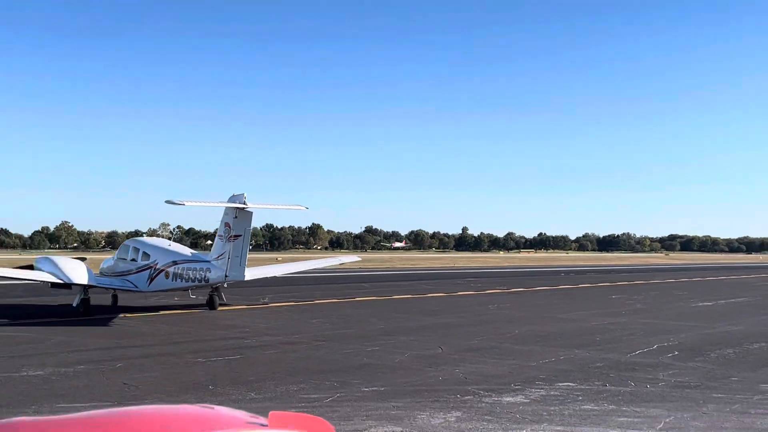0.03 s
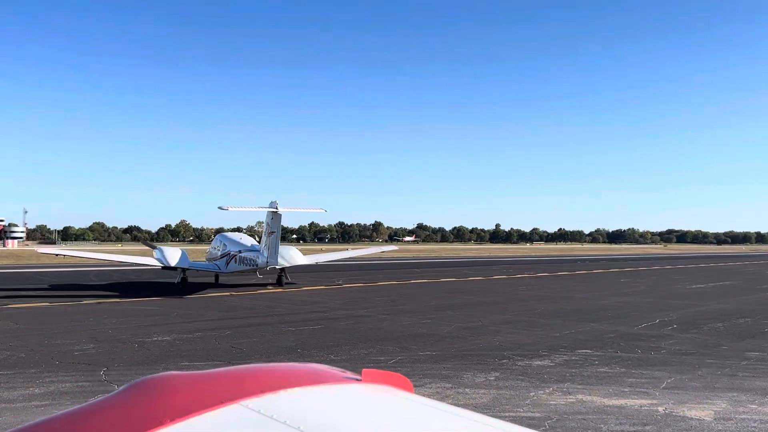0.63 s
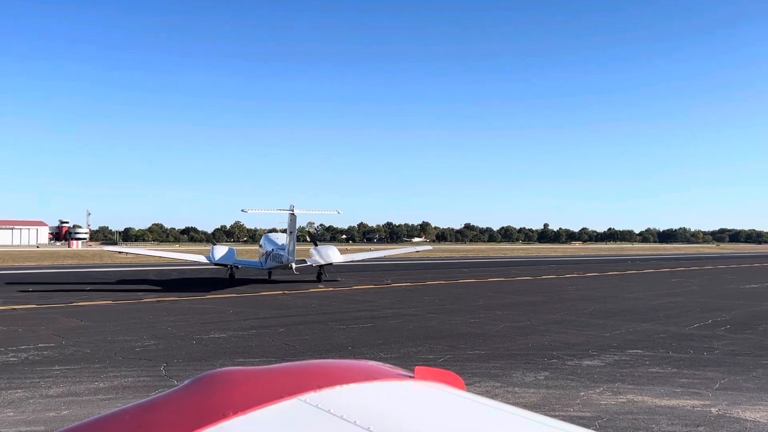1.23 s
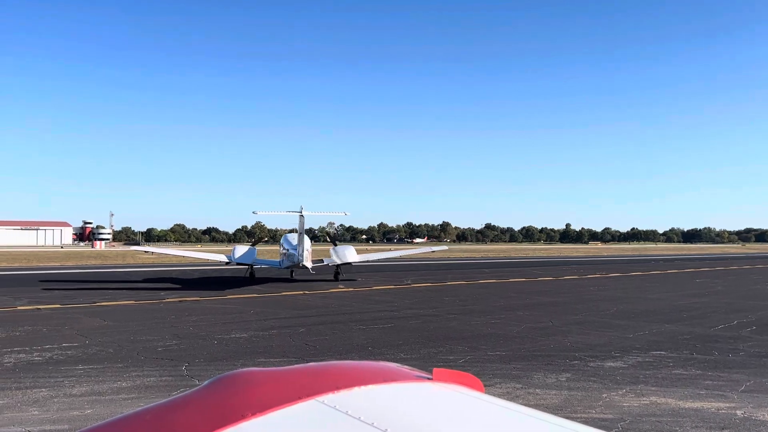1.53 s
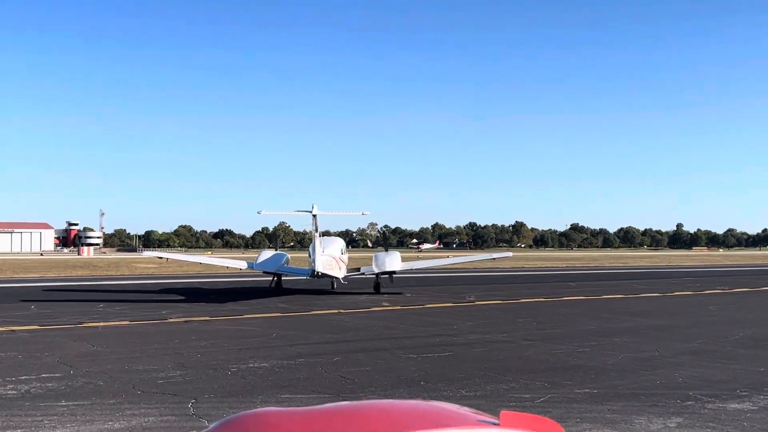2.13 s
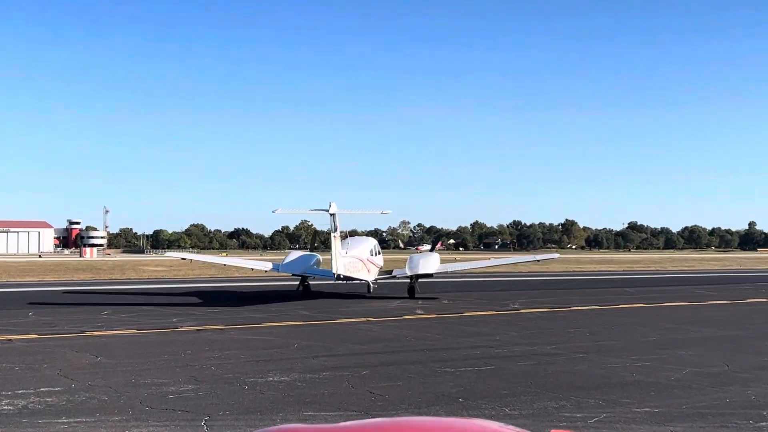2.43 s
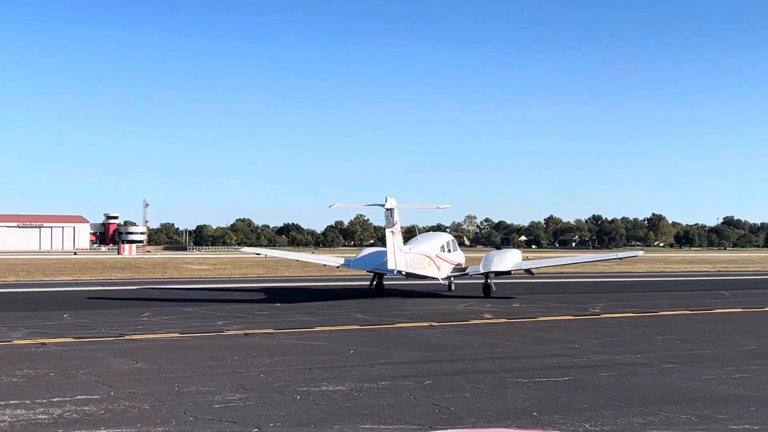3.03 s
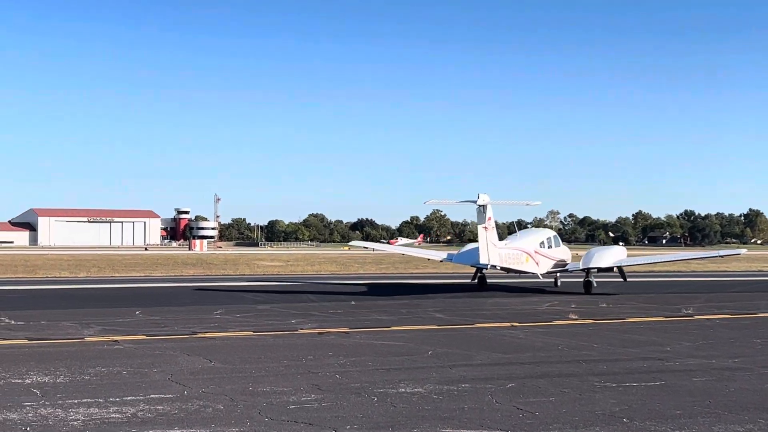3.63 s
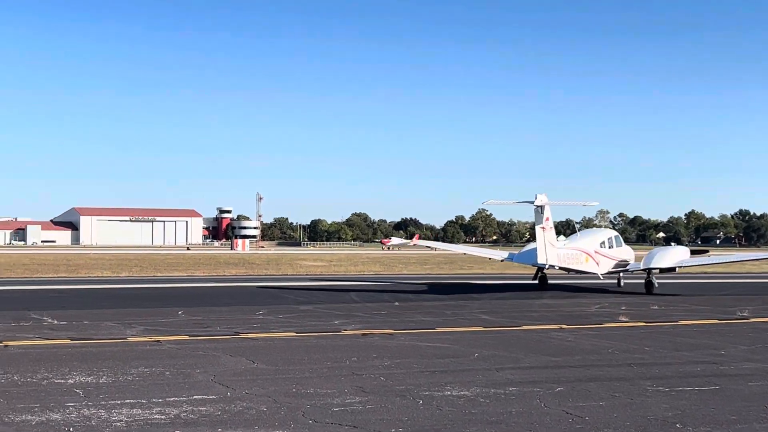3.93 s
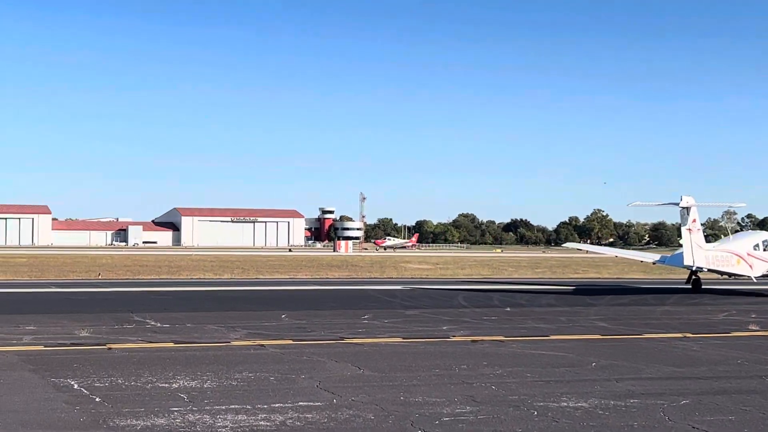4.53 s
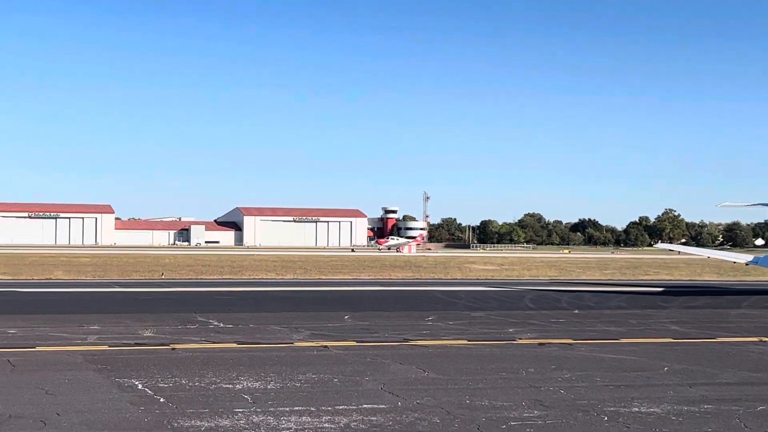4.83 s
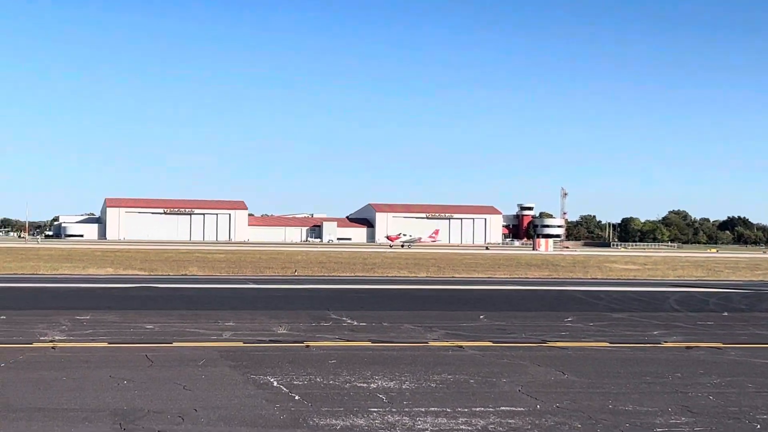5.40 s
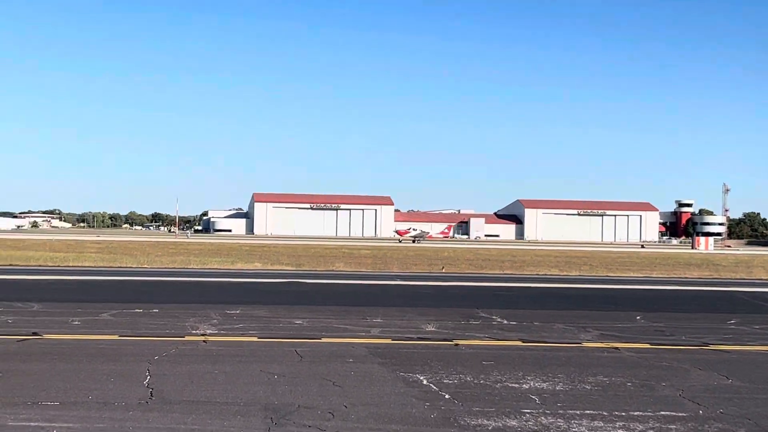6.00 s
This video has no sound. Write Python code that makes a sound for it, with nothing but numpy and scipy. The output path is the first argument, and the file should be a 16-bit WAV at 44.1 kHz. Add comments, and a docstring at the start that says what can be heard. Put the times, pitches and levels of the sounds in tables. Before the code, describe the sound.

A small twin-engine propeller plane taxis close by on open tarmac, its piston engines droning throughout. It starts with raspy exhaust barks, metallic clatter and hissing propeller wash that rumbles on the microphone. One engine rises slightly in pitch over the first two seconds. Around 1 to 1.3 seconds there is a brief blade slap and a gust thump, and the bright sizzle fades by 2 seconds. Short barks and rattles keep breaking through the drone. From 3 seconds one engine is throttled back, its pitch sinking, and the fast flutter between the engines slows into a throb; the wind buffeting drops near 3.6 seconds. A propeller slaps in rapid, choppy bursts from about 4.1 to 4.6 seconds and again from 5.3 to 6, while an airy whir grows. A few faint dry ticks occur, and the engines are still running at the end, just past 6 seconds.

```python
"""A light twin-engine piston plane taxis past and turns right on an airfield apron.
At first both exhausts drone and bark, and the propeller wash rumbles and hisses while the tail points
this way. The left engine is opened up for the turn; after three seconds it is throttled back, so the
beat between the two firing rates slows. From four seconds on the right propeller slaps as its disc
swings edge-on, and its whir comes forward."""
import sys
import numpy as np
from scipy import signal
from scipy.fft import rfft, irfft, next_fast_len
from scipy.io import wavfile
from scipy.ndimage import map_coordinates

SR = 44100
rng = np.random.default_rng(int(sys.argv[2]) if len(sys.argv) > 2 else 0)


def wrap_up_sound(samples):
    """Save the sound to the file named by the first command line argument, as 16-bit audio."""
    columns = np.atleast_2d(samples).T
    # keep every value between -1 and 1, then stretch to whole-number steps
    tamed = np.clip(columns, -1, 1)
    steps = np.round(tamed * 32767).astype(np.int16)
    wavfile.write(sys.argv[1], SR, steps)


N = 276066
TIME = np.arange(N) / SR
SIDES = np.array([[.5], [-.5]])  # shares a level or phase difference between left and right

# Engine speeds. Each row: time in seconds, firing rate in Hz.
LEFT_SPEED = [(0.0, 45.98), (0.34, 48.0), (1.06, 49.76), (2.1, 50.75), (3.0, 50.84), (3.47, 48.79),
              (4.29, 43.47), (4.75, 41.84), (5.2, 41.03), (5.68, 40.99), (6.0, 40.22), (6.26, 38.84)]
RIGHT_SPEED = [(0.0, 41.05), (2.04, 41.06), (4.85, 40.86), (5.74, 41.77), (6.26, 40.49)]
# Exhaust strength through the turn. Each row: time in seconds, boom in dB, drone in relative dB.
LEFT_EXHAUST = [(0.2, -17.5, -20.5), (1.3, -17.5, -23), (2.4, -28, -24), (3.3, -25.5, -27.5),
                (4.6, -26.5, -29.5), (5.35, -24.5, -28.5), (6.26, -27, -28)]
RIGHT_EXHAUST = [(0, -22.5, -20.5), (1.1, -24, -36.5), (3.5, -25.5, -30), (4.7, -26, -30.5),
                 (5.6, -28, -37)]
# Spectra of the pipe, its gas puffs and its pulse fronts. Each row: frequency in Hz, gain in dB.
PIPE_SPECTRUM = [(38, -7), (43, -7.5), (50, 3), (122, 0.5), (150, -1), (170, -8.5), (210, -11),
                 (250, -11.5), (290, -16), (340, -15), (450, -22), (700, -25.5), (1000, -32.5), (1500, -24)]
PUFF_SPECTRUM = [(120, -10), (300, -0.5), (500, 8), (750, -1), (1050, -1.5), (1330, 7), (1550, -1.5),
                 (1750, 1.5), (2050, -4), (2500, -9.5), (3500, -22.5), (6000, -30), (12000, -76)]
PUNCH_SPECTRUM = [(150, -34), (400, -2.5), (600, -1.5), (800, 1.5), (1050, -7), (1330, -2), (1570, -5.5),
                  (1720, -3), (2000, -11), (2600, -15.5), (5000, -32.5)]
# Surges in which an exhaust barks and rattles its cowling. Each row: centre in seconds, engine,
# half length in seconds, bark pitch in Hz, then bark, punch, rasp and rattle levels in dB.
SURGES = [(0.147, "left", 0.15, 623, -44, -42.5, -49, -40), (0.206, "right", 0.12, 690, -56, -64, -52, -53),
          (0.495, "left", 0.089, 310, -31.5, -50, -64, -54),
          (0.805, "left", 0.12, 635, -50, -44.5, -58, -67),
          (1.233, "left", 0.068, 520, -54, -48.5, -58, -54),
          (1.99, "right", 0.17, 860, -46.5, -46, -45.5, -54),
          (2.443, "left", 0.091, 436, -49, -63, -67, -48), (2.59, "left", 0.048, 537, -46, -64, -58, -53),
          (2.67, "left", 0.045, 420, -37, -37.5, -49, -45),
          (2.755, "left", 0.04, 560, -42, -37.5, -50, -52),
          (2.99, "left", 0.051, 490, -38.5, -49.5, -56, -47),
          (3.02, "left", 0.12, 199, -33.5, -64, -57, -53), (3.1, "left", 0.026, 595, -46, -50, -44, -44),
          (3.333, "left", 0.045, 385, -35.5, -54, -51, -54),
          (3.474, "left", 0.073, 550, -39, -62.5, -57, -50),
          (3.722, "left", 0.063, 590, -46, -44.5, -47, -47),
          (3.893, "left", 0.088, 545, -37, -53, -54, -53), (4.102, "right", 0.096, 296, -52, -44, -44, -44),
          (4.286, "right", 0.15, 280, -36.5, -52, -39.5, -47),
          (4.9, "right", 0.18, 314, -36, -58, -55, -52.5), (5.758, "left", 0.1, 287, -38.5, -65, -58, -45)]
# Ringing bands of the left exhaust.
# Each row: centre and half length in seconds, band centre and half width in Hz, level in dB.
GROWLS = [(0.15, 0.16, 620, 115, -32), (0.2, 0.33, 1800, 150, -39), (0.33, 0.07, 810, 80, -36),
          (1.28, 0.15, 1180, 150, -44), (1.7, 0.3, 800, 120, -43)]

# Spectra of the blade pulses. Each row: frequency in Hz, gain in dB.
LEFT_BLADE = [(200, -43), (600, 3), (1200, 22), (2000, 12.5), (3300, 1), (5000, -9), (14000, -25)]
RIGHT_BLADE = [(150, -25.5), (380, 17), (850, 12.5), (1400, 6.5), (1700, -2), (2150, -8.5), (2650, -6),
               (3300, -11), (4500, -13), (14000, -17.5)]
# Spells of slap as a propeller disc swings edge-on. Each row: centre in seconds, engine,
# half length in seconds, ring pitch in Hz, ring level in dB, crack level in dB.
SLAPS = [(1.048, "left", 0.025, 2050, -38, -30), (1.085, "left", 0.013, 1650, -35, -38),
         (1.327, "left", 0.16, 1410, -66, -41), (4.108, "right", 0.064, 1410, -40, -44),
         (4.177, "right", 0.015, 1400, -37, -35.5), (4.244, "right", 0.03, 1450, -37, -36.5),
         (4.323, "right", 0.07, 1500, -40.5, -39.5), (4.458, "right", 0.065, 1670, -40, -41.5),
         (4.58, "right", 0.036, 1750, -39, -36.5), (5.314, "right", 0.067, 1400, -39, -35.5),
         (5.418, "right", 0.063, 890, -42, -36), (5.517, "right", 0.049, 1100, -44, -32),
         (5.585, "right", 0.011, 1450, -39, -34.5), (5.677, "right", 0.071, 1100, -39, -29),
         (5.777, "right", 0.038, 1390, -30, -29.5), (5.819, "right", 0.032, 2800, -40, -34.5),
         (5.864, "right", 0.041, 810, -40, -33), (5.944, "right", 0.03, 515, -32.5, -41.5),
         (6, "right", 0.043, 880, -39.5, -38)]
# Modes rung by slaps, surges and valves, in that order. Each row: frequency in Hz, Q, gain in dB.
AIRFRAME_MODES = [(910, 5, -8), (1420, 12, -11.5), (1680, 22, -11), (2650, 7, -17)]
PANEL_MODES = [(1340, 9, -2), (1700, 12, 0)]
COWLING_MODES = [(1739, 11.5, 1.5), (1964, 11, -2), (4960, 14, -14)]

# Spectra of the five wash noises and the engine's sizzle. Each row: frequency in Hz, gain in dB.
RUMBLE_SPECTRUM = [(15, -36), (28, -16), (42, -14), (58, 0.5), (75, -7), (110, -8), (180, -18.5),
                   (300, -44), (800, -57)]
RUSH_SPECTRUM = [(60, -0.5), (130, 10.5), (240, 5), (350, 3), (500, -7), (800, -3.5), (1050, -9),
                 (1400, -6), (1780, -12), (2200, -16), (3500, -34), (6000, -34), (15000, -69)]
WHIR_SPECTRUM = [(1500, -38), (2200, -8), (2550, -2), (2850, 4), (3300, 2), (3900, -5), (4500, -7),
                 (7000, -34)]
HISS_SPECTRUM = [(1500, -24), (2400, 8.5), (3700, 8), (4400, 6.5), (4950, 4.5), (5500, 3.5), (6500, 2.5),
                 (9000, 1), (15500, -5.5)]
SLIPSTREAM_SPECTRUM = [(400, -10), (720, 20.5), (1100, 5), (1550, -5), (1780, 11.5), (2050, 3.5),
                       (2450, 3.5), (3600, 6.5), (4400, -11), (6000, -3.5), (7300, -0.5), (9000, 3),
                       (12500, -4), (15500, 0)]
SIZZLE_SPECTRUM = [(2200, -23), (3500, 2), (4400, -13), (6000, -12), (7300, 4), (9000, -2.5), (12500, 1.5),
                   (15500, 2.5)]
# Envelopes of the noises as the plane turns. Each row: time in seconds, level in dB.
RUSH_LEVEL = [(0.1, -28), (0.8, -33.5), (1.5, -34.5), (2.5, -38), (3.6, -39), (4.6, -37), (5.8, -34.5),
              (6.2, -33.5)]
HISS_LEVEL = [(0.1, -38.5), (0.87, -55), (1.53, -54), (2.59, -49.5), (3.1, -58), (4.55, -49.5), (4.83, -50),
              (5.65, -45.5), (5.9, -52), (6.2, -52.5)]
SIZZLE_LEVEL = [(0, -55), (0.4, -49), (0.75, -43.5), (1.1, -45.5), (1.25, -51.5), (1.45, -58), (1.9, -67),
                (2.6, -87)]
WHISTLE_LEVEL = [(0, -48.5), (1.0, -73), (1.6, -77), (2.1, -59.5), (2.6, -60), (2.9, -68.5), (4.0, -70)]
# Gusts of wash that thump the microphone. Each row: centre and half length in seconds, rise in dB.
GUSTS = [(0.88, 0.09, 2), (1.258, 0.04, 8), (2.03, 0.04, 2), (2.437, 0.03, 5), (3.48, 0.074, 4)]
# Stray ticks. Each row: time in seconds, ring pitch in Hz, peak in dB.
TICKS = [(1.218, 3400, -25), (3.822, 1800, -27), (6.105, 2090, -26)]

# Diffuse part of a noise. Each row: frequency in Hz, level against the direct part in dB.
DIFFUSE_SHARE = [(40, -10), (200, -14), (700, -4.5), (1500, -3.5), (2500, -9.5), (4000, -42), (8000, -47),
                 (15000, -57)]
# Left-right phase difference by frequency, which widens the stereo image.
# Each row: frequency in Hz, lead of the left in radians.
STEREO_PHASE = [(100, 0.05), (1000, 0), (1350, -0.2), (1600, -2.3), (1780, 0), (5100, 0), (5600, -0.9),
                (6300, 0), (7500, 0), (9000, -2.4), (10500, -3.6), (11800, -6.28), (13500, -6.28),
                (15500, -9.4)]
# Left-right balance by frequency. Each row: frequency in Hz, left minus right in dB.
STEREO_BALANCE = [(60, 0.33), (300, 0.5), (550, 3), (700, -1), (900, 3.5), (1150, -0.5), (1330, -1),
                  (1580, -6), (1850, -1), (2100, 1), (2600, -1)]


def left_engine():
    """Unequal thrust turns the plane: the outer engine speeds up, then is throttled back."""
    firing_hz, cycles = firing(LEFT_SPEED)
    boom_db, drone_db = curves(LEFT_EXHAUST)
    tone = exhaust(firing_hz, cycles, boom_db, drone_db)
    puffs = rasp("left", cycles, steady_db=drone_db - 21.5, at=.83, width=.33, front_db=-3.5)
    blades = slap("left", cycles, LEFT_BLADE, at=.1042, lead_ms=.023, pan_db=5.5, grit=.21)
    return (tone + growl(firing_hz, cycles) + puffs + blades + clatter(cycles) + sizzle(cycles)
            + rattle("left", cycles, at=.88, grit=1.8))


def right_engine():
    """The inner engine holds a fast idle and beats against the outer at their difference frequency."""
    firing_hz, cycles = firing(RIGHT_SPEED)
    boom_db, drone_db = curves(RIGHT_EXHAUST)
    tone = exhaust(firing_hz, cycles, boom_db, drone_db)
    puffs = rasp("right", cycles, steady_db=drone_db - 20.5, at=.8, width=.11, front_db=-8)
    blades = slap("right", cycles, RIGHT_BLADE, at=.1275, lead_ms=-.22, pan_db=-2.5, grit=.14)
    return tone + puffs + blades + rattle("right", cycles, at=.77, grit=1.6)


def firing(speed):
    """Phase is the integral of rate; four cylinders and two blades give one blade passage a firing."""
    hz, = curves(speed)
    return hz, np.cumsum(hz) / SR


def exhaust(firing_hz, cycles, boom_db, drone_db, jitter_rad=.11, drift_rad=1.4, waver_db=5.5):
    """Periodic firing gives a harmonic series: the second booms in the pipe, the higher ones waver."""
    boom = amp(boom_db) * np.cos(2 * np.pi * 2 * cycles)
    drone = np.zeros(N)
    for k in [1, *range(3, 26)]:
        looseness = min(k / 6, 1) ** 2
        stray_phase = jitter_rad * np.sqrt(k) * wobble(11) + drift_rad * looseness * wobble(2.01)
        waver = waver_db * np.sqrt(looseness) * np.tanh(wobble(4))
        level = amp(along(PIPE_SPECTRUM, k * firing_hz) + waver)
        drone += level * np.cos(2 * np.pi * (k * cycles + rng.random()) + stray_phase)
    return np.sqrt(2) * (boom + amp(drone_db - 8) * drone)


def rasp(engine, cycles, steady_db, at, width, front_db, chuff_hz=416):
    """Each firing releases a pressure front, a chuff and turbulent gas; surges add a resonant bark."""
    gas = noise(PUFF_SPECTRUM)
    puffs = unit(bumps(cycles, at, width, scatter_db=4)) * gas
    pops = unit(bumps(cycles, at, width=.075, scatter_db=2)) * gas
    kicks = unit(bumps(cycles, at - .04, width=.018, scatter_db=1.2)) + amp(-22) * puffs.mean(axis=0)
    fronts = bumps(cycles, at - .04, width=.003, scatter_db=1.2)
    punch = unit(filtered(fronts, causal(PUNCH_SPECTRUM)))
    chuff = resonance(kicks, chuff_hz, qs=(1, .98))
    out = amp(steady_db) * (puffs + chuff + amp(front_db) * punch)
    for s, which, half_s, hz, bark_db, punch_db, rasp_db, _ in SURGES:
        if which == engine:
            bark = resonance(kicks, hz, qs=(2, 1))
            out += swell(s, half_s) * (amp(bark_db) * bark + amp(punch_db) * punch + amp(rasp_db) * pops)
    return out


def growl(firing_hz, cycles):
    """Pipe resonance lasts between firings, so a few neighbouring harmonics stand out as clean lines."""
    out = np.zeros(N)
    for s, half_s, hz, width_hz, db in GROWLS:
        nearest = round(hz / firing_hz[int(s * SR)])
        band = np.zeros(N)
        for k in range(nearest - 4, nearest + 5):
            weight = np.exp(-((k * firing_hz - hz) / width_hz) ** 2)
            band += weight * np.cos(2 * np.pi * (k * cycles + rng.random()) + .2 * wobble(12))
        out += amp(db) * swell(s, half_s) * unit(band)
    return out


def slap(engine, cycles, spectrum, at, lead_ms, pan_db, grit, echo_gain=.071, echo_s=.0004):
    """Each blade's suction pulse and tip turbulence reflect off the tarmac and excite airframe modes."""
    suction = -bumps(cycles, at, width=.002, scatter_db=1)
    eddies = bumps(cycles, at + .02, width=.045, scatter_db=1.5) * rng.standard_normal(N)
    ground = lambda hz: 1 + echo_gain * np.exp(-2j * np.pi * hz * echo_s)
    blade = unit(filtered(suction + grit * eddies, lambda hz: causal(spectrum)(hz) * ground(hz)))
    airframe = sum(amp(db) * resonance(blade, hz, qs=(q,)) for hz, q, db in AIRFRAME_MODES)
    crack = unit(blade + airframe)
    chop = np.zeros(N)
    for s, which, half_s, hz, ring_db, crack_db in SLAPS:
        if which == engine:
            ring = resonance(blade, hz, qs=(1.8, 1))
            chop += swell(s, half_s) * (amp(crack_db) * crack + amp(ring_db) * ring)
    # The slap reaches the nearer side first; the lead fades out above 1700 Hz.
    lead_rad = lambda hz: 2 * np.pi * hz * lead_ms / 1000 / (1 + (hz / 1700) ** 6)
    return filtered(chop, lambda hz: stereo(pan_db, lead_rad(hz)))


def wash():
    """Turbulence behind the propellers makes broadband noise; blade passage modulates its treble."""
    left_cycles, right_cycles = firing(LEFT_SPEED)[1], firing(RIGHT_SPEED)[1]
    left, right = (np.cos(2 * np.pi * (cycles - .12)) for cycles in (left_cycles, right_cycles))
    flutter = 1 + .23 * left + .051 * right
    gust = wobble(6.8)
    chop = unit(2 + 2.7 * bumps(left_cycles, at=.018, width=.12, scatter_db=2.5))
    # The slipstream drops as the tail swings off; its wider buffeting lasts longer.
    slipstream_db = -40 - 25 * swing(1.51, .17)
    buffet_db = -30.3 - TIME - 9 * swing(3.6, .06)  # also sags 1 dB a second
    whir_db = -64.5 + 13.5 * swing(4.8, .43)  # the inner propeller turns into view
    thumps_db = sum(db * swell(s, half_s) for s, half_s, db in GUSTS)
    rumble = amp(buffet_db + thumps_db + 1.4 * wobble(3.15)) * noise(RUMBLE_SPECTRUM)
    rush = amp(curves(RUSH_LEVEL)[0] + .17 * gust) * noise(RUSH_SPECTRUM)
    whir = amp(whir_db + 2 * wobble(11)) * flutter * noise(WHIR_SPECTRUM)
    hiss = amp(curves(HISS_LEVEL)[0] + .8 * gust + .8 * wobble(25)) * flutter * noise(HISS_SPECTRUM)
    slipstream = amp(slipstream_db + 1.1 * wobble(29)) * chop * noise(SLIPSTREAM_SPECTRUM)
    return rumble + rush + whir + hiss + slipstream


def clatter(cycles, start_db=-37, fade_db_per_s=7.5):
    """Valve impacts excite the cowling's modes once a firing, fading as the plane moves off."""
    taps = (bumps(cycles, at=.93, width=.2, scatter_db=4.5) + .4) * rng.standard_normal(N)
    clicks = bumps(cycles, at=.85, width=.003, scatter_db=1.5)
    impacts = unit(taps) + .3 * unit(clicks)
    ring = sum(amp(db) * resonance(impacts, hz, qs=(q, q / 2)) for hz, q, db in COWLING_MODES)
    return amp(start_db - fade_db_per_s * TIME) * unit(ring)


def rattle(engine, cycles, at, grit):
    """Forced vibration: in a surge each firing jolts the sheet metal of the cowling."""
    buzz = unit(bumps(cycles, at + .05, width=.09, scatter_db=1) * rng.standard_normal(N))
    knocks = unit(bumps(cycles, at, width=.003, scatter_db=1.5))
    ring = sum(amp(db) * resonance(knocks + grit * buzz, hz, qs=(q, 2.2)) for hz, q, db in PANEL_MODES)
    level = sum(amp(db) * swell(s, half_s) for s, which, half_s, *_, db in SURGES if which == engine)
    return level * unit(ring)


def sizzle(cycles):
    """Amplitude-modulated bright noise, heard from behind the engine: a spit a firing, fizz between."""
    spits = .35 + bumps(cycles, at=0, width=.085, scatter_db=2.5)
    return amp(curves(SIZZLE_LEVEL)[0]) * unit(spits * noise(SIZZLE_SPECTRUM))


def whistle(hz=4930):
    """Narrow-band noise from the engines is heard as a faint, breathy pitch that comes and goes."""
    return amp(curves(WHISTLE_LEVEL)[0]) * resonance(rng.standard_normal(N), hz, qs=(14, 7))


def ticks():
    """Each small dry tick is the impulse response of a well-damped resonance."""
    out = np.zeros(N)
    for s, hz, db in TICKS:
        ring = resonance(signal.unit_impulse(N, round(s * SR)), hz, qs=(3.5, 3.5))
        out += amp(db) * ring / np.abs(ring).max()
    return out


def amp(db):
    """Amplitude grows tenfold for every 20 dB."""
    return 10 ** (np.asarray(db) / 20)


def unit(x):
    """Normalisation to rms 1."""
    return x / np.sqrt(np.mean(x ** 2) + 1e-20)


def along(points, hz):
    """Interpolation of (Hz, value) points on a logarithmic frequency axis."""
    f, v = np.transpose(points)
    return np.interp(np.log(hz + 1), np.log(f + 1), v)


def curves(rows):
    """Linear interpolation in time: one value a sample for each column after the first."""
    s, *columns = np.transpose(rows)
    return [np.interp(TIME, s, column) for column in columns]


def swell(s, half_s):
    """A Gaussian envelope centred on s seconds."""
    return np.exp(-((TIME - s) / half_s) ** 2)


def swing(s, swing_s):
    """A logistic step from 0 to 1, centred on s seconds, with time constant swing_s."""
    return .5 + .5 * np.tanh((TIME - s) / (2 * swing_s))


def wobble(rate):
    """Slow random modulation: a spline through rate knots a second."""
    knots = rng.standard_normal(int(N * rate / SR) + 4)
    coarse = np.arange(0, N, 64)
    return np.interp(np.arange(N), coarse, map_coordinates(knots, [coarse * rate / SR]))


def bumps(cycles, at, width, scatter_db):
    """A Gaussian pulse train, one pulse of random size a cycle; at and width are in cycles."""
    place = cycles - at + 1.5
    size = amp(scatter_db * rng.standard_normal(SR))[np.abs(place).astype(int)]
    return size * np.exp(-((place % 1 - .5) / width) ** 2)


def noise(spectrum):
    """Stereo noise of rms 1: a direct part in phase and a weaker diffuse part in antiphase."""
    direct_db = lambda hz: along(spectrum, hz)
    mid = filtered(rng.standard_normal(N), lambda hz: amp(direct_db(hz)))
    side = filtered(rng.standard_normal(N), lambda hz: amp(direct_db(hz) + along(DIFFUSE_SHARE, hz)))
    return unit(np.array([mid + side, mid - side]))


def resonance(x, hz, qs):
    """Second-order resonators in cascade, one for each Q in qs; the result has rms 1."""
    for q in qs:
        x = unit(signal.lfilter(*signal.iirpeak(hz, q, fs=SR), x))
    return x


def filtered(x, response):
    """Convolution: the spectrum of x is multiplied by a complex frequency response."""
    size = next_fast_len(N + SR // 4)
    return irfft(rfft(x, size) * response(np.fft.rfftfreq(size, 1 / SR)), size)[..., :N]


def causal(points):
    """The minimum-phase response with these (Hz, dB) gains: resonances ring after the pulse."""
    def response(hz):
        cepstrum = irfft(np.log(amp(along(points, hz))))
        half = len(cepstrum) // 2
        fold = np.r_[1, np.full(half - 1, 2), np.zeros(half)]
        return np.exp(rfft(cepstrum * fold))
    return response


def stereo(balance_db, lead_rad):
    """Direction cues: two complex gains with this level and phase difference, left minus right."""
    return amp(SIDES * balance_db) * np.exp(1j * SIDES * lead_rad)


def scene():
    """Superposition of both engines, their wash and the small sounds over open tarmac."""
    return left_engine() + right_engine() + wash() + whistle() + ticks()


def record(dry, top_hz=15600):
    """Left-right level and phase differences widen the stereo image; nothing passes above top_hz."""
    widening = lambda hz: stereo(along(STEREO_BALANCE, hz), along(STEREO_PHASE, hz))
    return filtered(dry, lambda hz: widening(hz) * (hz < top_hz))


dry = scene()
out = record(dry)
wrap_up_sound(out)
```